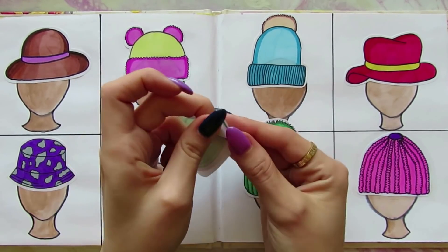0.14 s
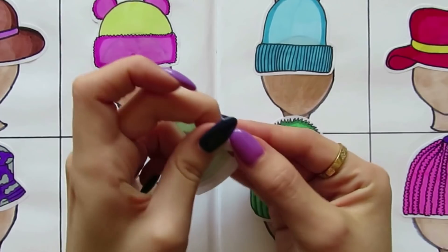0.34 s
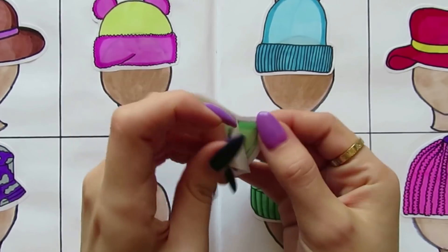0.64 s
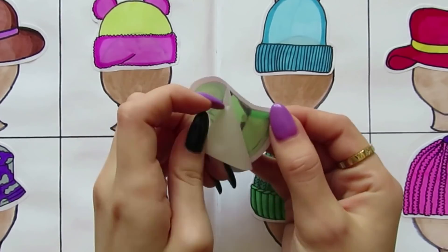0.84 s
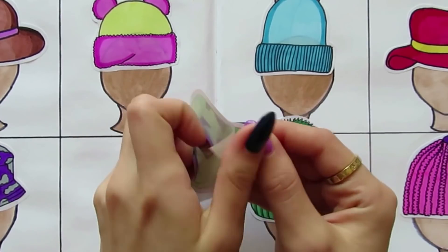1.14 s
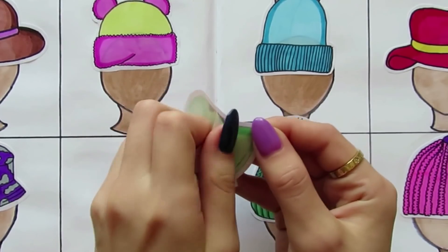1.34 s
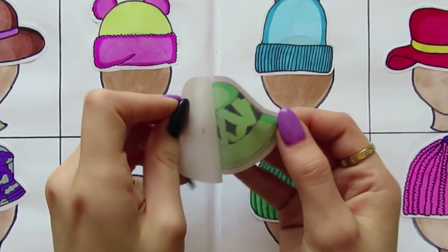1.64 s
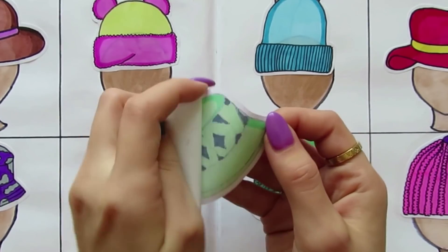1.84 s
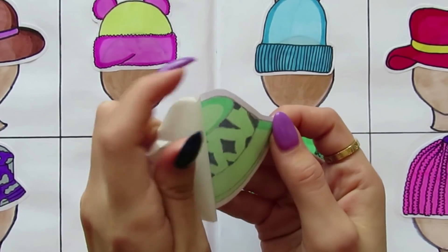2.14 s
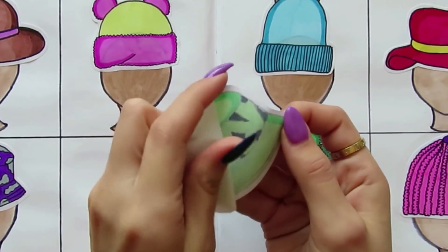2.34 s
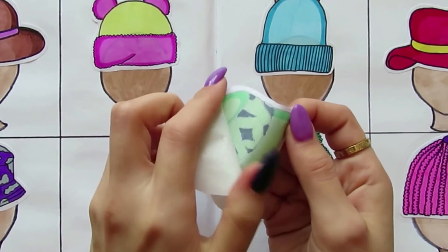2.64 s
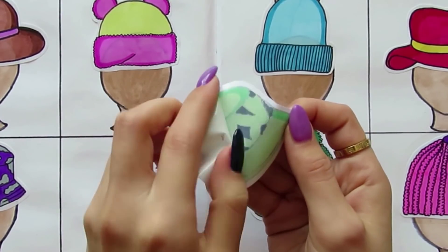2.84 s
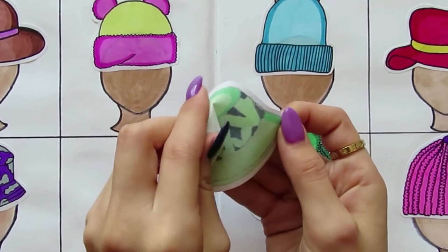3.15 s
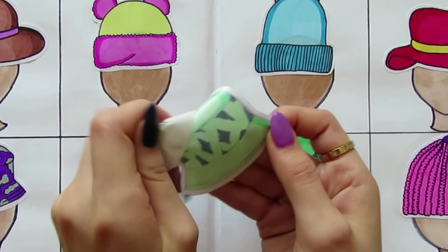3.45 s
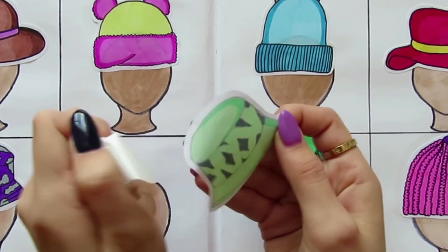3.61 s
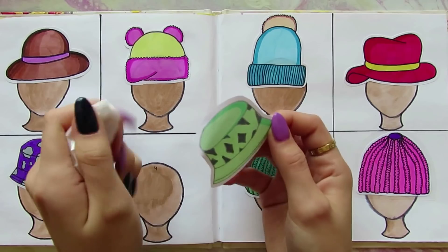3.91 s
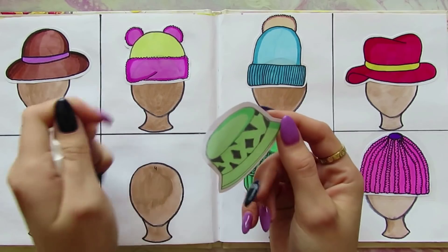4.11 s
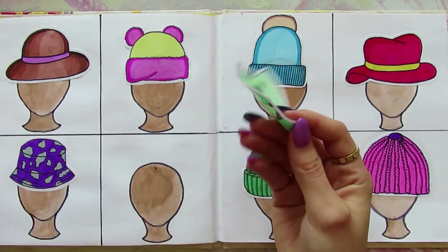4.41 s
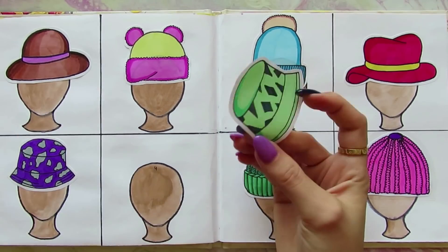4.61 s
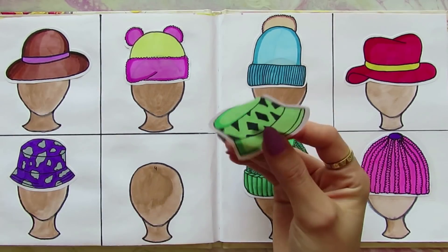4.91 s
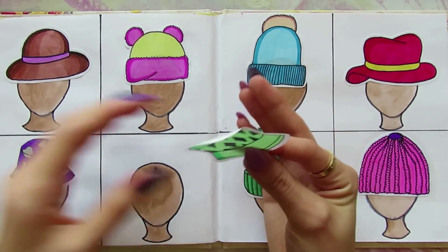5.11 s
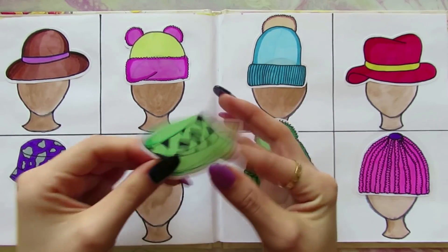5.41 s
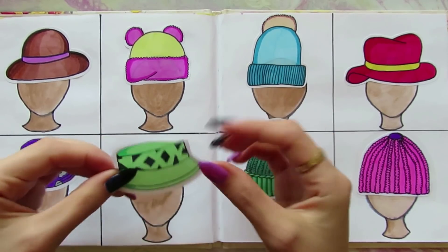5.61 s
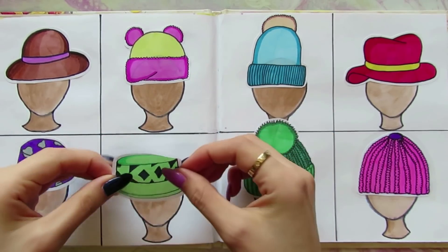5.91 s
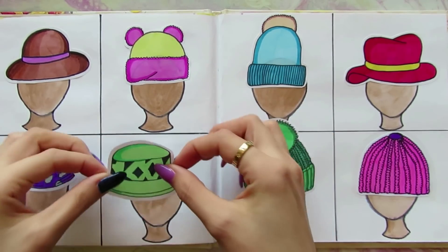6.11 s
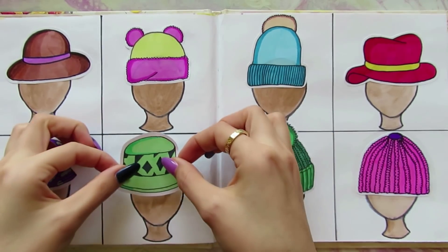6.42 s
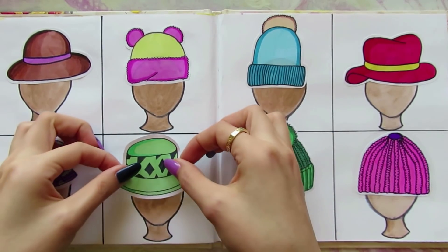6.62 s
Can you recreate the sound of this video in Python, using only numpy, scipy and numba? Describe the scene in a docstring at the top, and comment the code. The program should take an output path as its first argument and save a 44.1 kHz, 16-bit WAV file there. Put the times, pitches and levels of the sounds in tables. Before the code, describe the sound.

Stiff paper rustles, crackles and snaps loudly near the microphone, is crumpled in a hand, then quiets to light clicks over faint low hum.

```python
"""In a small room, close to a microphone, fingers peel a paper sticker off its backing, crumple the backing
and set the sticker on a notebook page. Glue threads and fibres let go in random slips: a dense fine crackle.
Flexing sheets rustle more dully; buckling creases and fingernails snap as short damped bursts, loud enough to clip.
Fingertip taps, single ticks and resonant rasps join in; wavering sines and coloured noise make a low hum."""
import sys
import numpy as np
from scipy import signal
from scipy.fft import rfft, irfft
from scipy.io import wavfile
from scipy.ndimage import uniform_filter1d, map_coordinates
from numba import njit

SR = 44100
rng = np.random.default_rng(int(sys.argv[2]) if len(sys.argv) > 2 else 0)


def output_pcm(signal):
    """Save a mono or channel-first signal as 16-bit PCM at the path in sys.argv[1].

    Samples are clipped to [-1, 1] before scaling.
    """
    pcm = np.clip(np.atleast_2d(signal).T, -1, 1) * 32767
    wavfile.write(sys.argv[1], SR, np.round(pcm).astype(np.int16))


N = 298116
TIME = np.arange(N) / SR  # s
FREQ = np.maximum(np.fft.rfftfreq(N, 1 / SR), 1)  # Hz
TOP_HZ = 15750  # upper band limit


def undb(db):
    """Level definition: decibels to amplitude gain."""
    return np.exp(np.log(10) / 20 * np.asarray(db))


def unit(x):
    """Normalisation: scale to an rms of 1."""
    return x / np.sqrt(np.mean(x ** 2))


def gain_at(points, f):
    """Spectral envelope: gain at f, interpolated in dB over log frequency."""
    hz, db = np.transpose(points)
    return undb(np.interp(np.log(f), np.log(hz), db))


def colour(x, points):
    """Linear filtering: shape x by a spectral envelope, then scale to rms 1."""
    return unit(irfft(rfft(x) * gain_at(points, FREQ), N))


def curves(table):
    """Linear interpolation: each column of a table as a curve in time."""
    s, *columns = np.transpose(table)
    return [np.interp(TIME, s, c) for c in columns]


def walk(rate):
    """Low-pass random process: a smooth wander with rms 1, taking about rate new values per second."""
    hold = max(int(SR / rate), 2)
    steps = np.repeat(rng.standard_normal(N // hold + 1), hold)
    return unit(uniform_filter1d(steps, hold)[:N])


def swell(middle, length):
    """Gaussian envelope: a smooth rise and fall, down to exp(-2) at one length from the middle."""
    return np.exp(-2 * ((TIME - middle) / length) ** 2)


def crackle(rate, spread_db, t60, smooth):
    """Shot noise: random slips, few large and many small, decay as noise; smooth is the share of even hiss."""
    size = undb(spread_db * np.minimum(rng.exponential(size=N), 5))
    slips = (rng.random(N) < rate / SR) * size ** 2
    decay = undb(-60 / (t60 * SR)) ** 2  # of power, per sample
    power = signal.lfilter([1], [1, -decay], slips)
    share = np.clip(smooth, 0, 1)
    return np.sqrt(share + (1 - share) * power / power.mean()) * rng.standard_normal(N)


# pulls on the backing, slides of the fingers, and the room dying away after loud snaps:
# start t/s, end t/s, friction level/dB, swell from start to end/dB, brightness/(dB per octave), flexing level/dB
STROKES = [(0.085, 0.202, -39, 8, 8, -55), (0.352, 0.383, -34.5, -3.5, 7.5, -47),
           (0.442, 0.476, -31, -7.5, 6.5, -47), (0.56, 0.744, -28.5, 3.5, 9, -42),
           (0.758, 0.831, -21.5, 6, 6.5, -36), (0.824, 0.914, -32, -7, 4, -42),
           (0.962, 1.186, -25.5, -7.5, 1, -38), (1.339, 1.415, -29, 3, 2.5, -41),
           (1.462, 1.653, -19.5, 13.5, 6, -36), (1.635, 1.693, -28.5, 7, -4, -32),
           (1.768, 1.787, -10, 7, 9, -29.5), (1.79, 1.94, -30.5, -7, -3.5, -38.5),
           (2.182, 2.203, -17.5, -4, 1, -23.5), (2.401, 2.424, -22.5, 1, -2.5, -31),
           (2.435, 2.568, -23.5, 7, 1, -38), (2.585, 2.734, -31.5, -16.5, -0.5, -39),
           (2.821, 2.838, -25, 1.5, 3.5, -26.5), (2.846, 2.985, -28, -2, 0.5, -34.5),
           (3.022, 3.087, -21.5, 1, 0.5, -33), (3.162, 3.206, -29, -7.5, -4.5, -40),
           (3.249, 3.343, -20, 3, -0.5, -35), (3.422, 3.507, -21, 10, -3, -40.5),
           (3.535, 3.592, -15, 2.5, -3, -39.5), (3.615, 3.686, -20.5, -10, -0.5, -38.5),
           (3.694, 3.746, -17, 9.5, 2.5, -40.5), (3.78, 3.803, -21.5, 18, 0.5, -39.5),
           (3.851, 4.073, -27.5, -11, 1.5, -53), (4.162, 4.24, -34, -4.5, 0.5, -73),
           (4.25, 4.254, -13.5, 3, 3, -60), (4.588, 4.606, -22.5, 5, -0.5, -44),
           (4.616, 4.684, -30.5, 4.5, 1.5, -47.5), (4.85, 4.947, -34, -9, 1, -48),
           (5.024, 5.114, -30, 13.5, 0, -35.5), (5.429, 5.512, -31, 23.5, 0.5, -37),
           (5.623, 5.783, -45.5, -8, -2, -75), (6.035, 6.163, -46, 4, -7, -61),
           (6.359, 6.381, -39, -3.5, 6.5, -44.5)]
# light rustle of the held paper: t/s, friction level/dB, flexing level/dB
HOLDING = [(0, -52, -56.5), (0.2, -45.5, -55), (0.32, -54.5, -61), (0.4, -45, -50), (1.05, -31.5, -40.5),
           (1.28, -39, -48), (1.85, -29, -43.5), (2.35, -34.5, -38.5), (2.8, -41.5, -48), (3.2, -35.5, -37),
           (3.6, -25.5, -33.5), (4.1, -46, -76), (4.43, -46, -53), (4.53, -43, -56), (4.8, -57.5, -50.5),
           (5.75, -50, -51.5), (6.2, -59, -47.5), (6.76, -76, -64)]
HOLDING_TILT_DB = 1.5  # brightness per octave
STROKE_ATTACK_S, STROKE_RELEASE_S = 0.0075, 0.0058  # time constants


def handling():
    """Energy addition: strokes and holding sum in power; gives friction dB, brightness, flexing dB."""
    rub, flex = undb(curves(HOLDING)) ** 2
    bright = HOLDING_TILT_DB * rub
    for start, end, db, swell_db, tilt_db, flex_db in STROKES:
        progress = np.clip((TIME - start) / (end - start), 0, 1)
        before = np.maximum(start - TIME, 0) / STROKE_ATTACK_S
        beyond = np.maximum(TIME - end, 0) / STROKE_RELEASE_S
        effort = undb(swell_db * (progress - .5)) * np.exp(-np.minimum(before + beyond, 20))
        power = (undb(db) * effort) ** 2
        rub = rub + power
        bright = bright + tilt_db * power  # brightness is averaged by power
        flex = flex + (undb(flex_db) * effort) ** 2
    return 10 * np.log10(rub), bright / rub, 10 * np.log10(flex)


# colour of the rubbed paper: f/Hz, level/dB
PAPER = [(1500, -14), (2300, -7.5), (3200, -4.5), (4400, -2), (5400, -3.5), (7300, 0.5), (9000, -6.5),
         (11000, -2), (13000, -7), (15800, -20)]


def friction(level_db, tilt_db, patchy_db=3.0, pivot_hz=6500):
    """Stick-slip friction: glue and fibres let go in grains; resonances shift with the grip and the curl."""
    slips = crackle(rate=1100, spread_db=3.5, t60=0.003, smooth=0.24)
    spectrum = rfft(slips) * gain_at(PAPER, FREQ)
    octave = np.log2(FREQ / pivot_hz)
    out, power = 0, 0
    for centre in np.arange(-2.75, 1.6, .25):  # overlapping bands, in octaves from the pivot
        band = np.maximum(1 - 4 * abs(octave - centre), 0)
        part = irfft(spectrum * band, N)
        gain = undb(tilt_db * centre + patchy_db * walk(18))
        out = out + gain * part
        power = power + gain ** 2 * part.var()
    return unit(out / np.sqrt(power)) * undb(level_db)  # tilting leaves the level unchanged


# colour shared by creases and taps: f/Hz, level/dB
SNAP_COLOUR = [(80, -1), (300, 0.5), (2400, -2), (4400, 0.5), (9000, -1), (11000, 2.5), (16000, -5.5)]


def snaps(events, t60_s, stretch, attack_s, strain_s, strain_db, q, tick_db=9, top_hz=11500, size=4096):
    """Damped resonance: faint creaking peaks as a patch gives way with a broad crack and a brief ring."""
    out = np.zeros(N + size)
    lead = size // 4
    t = (np.arange(size) - lead) / SR
    after = np.maximum(t, 0)
    f = np.maximum(np.fft.rfftfreq(size, 1 / SR), 1)
    strain = undb(strain_db) * np.exp(-abs(t) / strain_s)
    for s, db, hz, crack_db in events:
        t60 = t60_s * undb(stretch * crack_db)
        release = (1 - np.exp(-after / attack_s)) * np.exp(-np.log(1000) * after / t60)
        ring = 1 / (1 + (q * (f / hz - hz / f)) ** 2)
        crack = undb(crack_db) / np.hypot(1, (f / top_hz) ** 2)
        # a small patch radiates little far below its resonance
        radiation = f / np.hypot(f, hz / 4)
        band = gain_at(SNAP_COLOUR, f) * np.hypot(ring, crack) * radiation
        push = rng.standard_normal(size) * (release + strain)
        push[lead + int(attack_s * SR)] += undb(tick_db)  # the first fibre parts all at once
        burst = irfft(band * rfft(push))
        # the energy of a snap is its level held for half a decay constant
        energy = t60 * SR / (2 * np.log(1000))
        start = int(s * SR) - lead
        out[start:start + size] += undb(db) * burst * np.sqrt(energy / np.sum(burst ** 2))
    return out[:N]


# creases buckling and nails flicking off edges: t/s, level/dB, resonance of the paper patch f/Hz,
# broad crack against the resonance level/dB
CREASES = [(0.4393, -2.5, 9700, -13), (0.4425, -3.5, 8900, -20), (0.967, 8.5, 9800, -2.5),
           (1.062, -7, 3610, 2), (1.5973, -2.5, 11200, 1), (1.6453, -3.5, 6580, 10),
           (1.7623, 6, 11300, -14), (1.9406, 2, 4770, -5.5), (2.0738, -7.5, 4440, -13),
           (2.0773, -4, 5050, 5), (2.083, 2.5, 11500, -5), (2.1344, -5, 3930, 3), (2.192, 4.5, 11400, -3.5),
           (2.4245, -6, 9100, 12), (2.428, -5.5, 4570, -7), (2.552, 5, 5250, -10.5),
           (2.6028, -4, 4800, -5.5), (2.821, 7.5, 10500, 1), (2.8409, -2.5, 7700, 3),
           (2.9329, -1, 3140, -28), (3.026, 8, 6300, -6), (3.4087, 3, 3830, -28), (3.4429, 2, 11010, -18),
           (3.4472, 1.5, 11010, 8), (3.5397, 1, 10300, 3), (3.574, 2.5, 10110, -1.5),
           (3.6124, -2.5, 4290, -17), (3.6213, 2, 6340, -7), (3.6283, 8, 8000, -5),
           (3.7216, 7, 12100, -3.5), (3.7554, 3.5, 6000, -6.5), (3.8429, 2, 4850, -10.5),
           (3.8878, -1, 7170, -1), (3.8981, 3, 3040, -22), (3.9164, -8, 1680, -34),
           (3.9462, -4.5, 10500, 34), (4.061, -9, 6150, -21), (4.0791, -1, 7200, -26),
           (4.2061, -8.5, 4130, -42), (4.2215, -3.5, 11500, -9), (4.2856, -11.5, 3570, -37),
           (4.3631, -19, 2930, -18), (4.5962, -6.5, 9400, 2), (4.7658, -15.5, 10200, -6.5),
           (4.831, -17, 7000, -26), (4.8432, -7.5, 5150, -6), (5.124, -8, 3580, -10),
           (5.497, -1.5, 9800, 1), (5.503, 1, 9800, 5), (5.5203, -12, 3280, -11), (5.6143, 5, 6200, -18),
           (5.8097, -15, 4230, -21), (6.0101, 0.5, 7600, -7), (6.0314, -1.5, 6560, 7),
           (6.0355, -6, 4960, 13), (6.2585, -22, 2000, -30)]


def creases():
    """Buckling: a patch snaps to a new shape; a broader crack runs along the crease and lasts longer."""
    # t60_s holds at a crack of 0 dB; stretch is dB of length per dB of crack
    return snaps(CREASES, t60_s=0.012, stretch=0.1, attack_s=0.00054, strain_s=0.004, strain_db=-30.5, q=1.26)


# fingertips knocking on the sheet and the page: t/s, level/dB, resonance of the sheet f/Hz,
# broad crack against the resonance level/dB
TAPS = [(0.4425, -18, 1410, -26), (0.7231, -16, 600, -13), (0.8975, -16.5, 690, -28),
        (1.1421, -4.5, 300, 3), (1.7837, -1.5, 440, -2), (2.1461, -3.5, 1070, -7), (2.9329, -6, 475, -13.5),
        (3.275, -12.5, 684, -24), (3.3088, -11, 358, -16.5), (4.9347, -16, 310, -10),
        (4.9422, -18.5, 700, -13), (5.0258, -14, 1700, -35), (5.1117, -4, 300, 3), (5.117, -4.5, 600, 8),
        (5.3252, -19.5, 450, -6), (5.3371, -21, 353, -11.5), (5.783, -22, 1440, -14.5),
        (5.8097, -16, 325, -3), (6.2363, -29, 1100, -28.5), (6.3535, -20.5, 480, -16.5)]


def taps():
    """Impact excitation: a knock sets off a lower, broadly damped resonance of the sheet."""
    return snaps(TAPS, t60_s=0.022, stretch=0, attack_s=0.00042, strain_s=0.001, strain_db=-24.5, q=0.59)


def ticks(events, ring_hz=9800, shiver_db=-13, shiver_s=0.0015, size=512):
    """Impulse response: a release flicks a small patch, each at its own pitch; the sheet shivers briefly."""
    out = np.zeros(N + size)
    t = np.arange(size) / SR
    for (s, db), chance in zip(events, rng.standard_normal((len(events), size + 1))):
        hz = min(ring_hz * 2 ** (.5 * chance[0]), TOP_HZ)
        flick = np.sin(2 * np.pi * hz * t) * np.exp(-hz * t)
        shiver = undb(shiver_db) * chance[1:] * np.exp(-t / shiver_s)
        tick = signal.lfilter([1, -1], [1, -.5], flick + shiver)  # a small patch radiates little bass
        start = int(s * SR)
        out[start:start + size] += undb(db) * tick / abs(tick).max()
    return out[:N]


# glue threads and nail edges letting go: t/s, peak level/dB
RELEASES = [(0.6803, -3), (0.7708, -3.5), (0.8825, -10), (1.035, -1), (1.1693, -3), (1.6545, 3),
            (2.0062, -6), (2.0593, -9), (2.1257, -4), (2.4082, -4), (3.5916, 0), (3.9744, -2),
            (4.0035, -0.5), (4.0284, -10), (4.352, -7), (4.4656, -6), (5.2562, -16), (5.2952, -23),
            (5.3958, -16.5), (6.5823, -22)]


def releases():
    """Sudden release of tension: glue threads and nail edges let go with one sharp tick each."""
    return ticks(RELEASES)


def crinkles(level_db, most_db=-25, over_db=3, count=450):
    """Random impulses: tiny creases tick, louder with friction up to most_db; few are loud, many soft."""
    place, luck = rng.random((count, 2)).T
    at = (place * N).astype(int)
    db = np.minimum(level_db[at], most_db) + over_db - 4.5 * np.log(luck + .04)
    return ticks(np.transpose([at / SR, db]), ring_hz=7000)


# colour of the flexing sheets: f/Hz, level/dB
SHEET = [(100, -3), (220, 2.5), (400, -2), (500, 2), (650, -4), (820, 4), (1000, 0), (1900, -0.5),
         (4000, -15)]


def flexing(level_db):
    """Bending: the sheets yield in sparser, longer jerks, a coarser and duller rustle."""
    jerks = crackle(rate=420, spread_db=3.0, t60=0.017, smooth=0.34)
    return colour(jerks, SHEET) * undb(level_db)


# resonant rasps of the curled sheet, and one low ring after a tap:
# middle t/s, length/s, resonance f/Hz, width of each filter stage f/Hz, level/dB
RASPS = [(2.5, 0.11, 11900, 1200, -30.5), (3.268, 0.045, 2190, 900, -23.5), (3.28, 0.037, 5220, 1000, -23),
         (3.314, 0.024, 823, 50, -28)]


def rasps():
    """Resonance under random excitation: uneven jerks drive the sheet's rasps and one low ring after a tap."""
    spectrum = rfft(crackle(rate=400, spread_db=3, t60=.003, smooth=0))
    out = 0
    for s, length, hz, width, db in RASPS:
        resonance = 1 / (1 + 2j * (FREQ - hz) / width) ** 2
        out = out + undb(db) * swell(s, length) * unit(irfft(spectrum * resonance, N))
    return out


@njit
def resonator(x, hz, width):
    """State-variable filter: a band-pass with a moving centre and a gain of 1 there."""
    y, band, low = np.empty(len(x)), 0., 0.
    for i in range(len(x)):
        g, damping = np.tan(np.pi * hz[i] / SR), width / hz[i]
        v = (band + g * (x[i] - low)) / (1 + g * (g + damping))
        band, low, y[i] = 2 * v - band, low + 2 * g * v, damping * v
    return y


# hollow of the fist that crumples the backing: t/s, resonance f/Hz, strength (0-1)
FIST = [(3.58, 3400, 0.1), (3.66, 3400, 0), (3.84, 3050, 0.2), (3.92, 2870, 0.4), (4.07, 2830, 0.4),
        (4.27, 3030, 0.6), (4.42, 2600, 0.4), (4.52, 2700, 0.3)]


def fist(x, width_hz=1550, gain_db=5.5):
    """Cavity resonance: the hand closes round the backing and its hollow rings with the rustle."""
    hz, strength = curves(FIST)
    once = resonator(x, hz, float(width_hz))
    ring = resonator(once, hz, float(width_hz))
    closed = (TIME > FIST[0][0]) & (TIME < FIST[-1][0])
    return x + undb(gain_db) * strength * closed * ring


# room echo colour: f/Hz, level/dB
ECHO = [(100, 7.5), (2500, 8), (7000, 4), (16000, -7)]


def room(x, t60=0.54, wet_db=-21, desk_db=-21, desk_s=0.013):
    """Reflection and reverberation: a near surface echoes once; walls add a scattered, pitchless tail."""
    decay = np.exp(-np.log(1000) * TIME / t60)
    tail = colour(rng.standard_normal(N), ECHO) * decay * (TIME > desk_s)
    wet = signal.fftconvolve(x, tail[:SR] / np.sqrt(np.sum(tail ** 2)))[:N]
    scattered = map_coordinates(wet, [(TIME + .00013 * walk(300)) * SR])  # jittered reading times
    desk = np.pad(x, (int(desk_s * SR), 0))[:N]
    return x + undb(desk_db) * desk + undb(wet_db) * scattered


# steady hum tones, before wavering and swelling: f/Hz, level/dB
HUM = [(99.9, -47), (181, -56), (222.5, -55.5)]
# further low tones that come and go: middle t/s, length/s, f at the middle/Hz, glide/(Hz per s)
HUM_SWELLS = [(1.98, 0.21, 180.3, -0.5), (2.37, 0.36, 223, 45), (2.418, 0.42, 152, 35.5),
              (3.02, 0.19, 180.5, 1)]
# colour of the room rumble: f/Hz, level/dB
RUMBLE = [(15, -17.5), (30, -1), (140, -3), (260, -4), (400, -9), (2000, -28.5)]
# swelling and dipping of steady tones and rumble: t/s, level/dB
LOW_SWELL = [(0, -2.5), (.33, -0.5), (.36, 4), (3.85, 4.5), (3.97, -12), (4.4, -7), (4.9, -3), (6.1, -2.5),
             (6.76, 1)]


def hum(waver_db=2.0, drift=0.7, rumble_db=-45.5, passing_db=-44.5):
    """Superposition: wavering sines over a soft rumble; a few more tones swell, glide and fade."""
    tones, passing = 0, 0
    for hz, db in HUM:
        level = undb(db + waver_db * walk(5.1))
        tones = tones + level * np.sin(2 * np.pi * hz * TIME + drift * walk(6.8))  # drift in radians
    for s, length, hz, glide in HUM_SWELLS:
        phase = 2 * np.pi * np.cumsum(hz + glide * (TIME - s)) / SR
        passing = passing + swell(s, length) * np.sin(phase)
    rumble = undb(rumble_db) * colour(rng.standard_normal(N), RUMBLE)
    steady = (np.sqrt(2) * tones + rumble) * undb(curves(LOW_SWELL)[0])  # sqrt(2): rms to sine peak
    return steady + np.sqrt(2) * undb(passing_db) * passing


def scene(hiss_db=-68):
    """Superposition: all handling reaches both channels alike; each channel adds its own faint hiss."""
    level_db, tilt_db, flex_db = handling()
    snapping = creases() + taps()
    rustle = friction(level_db, tilt_db) + flexing(flex_db) + rasps()
    ticking = crinkles(level_db) + releases()
    paper = rustle + ticking + snapping
    return room(fist(paper)) + hum() + undb(hiss_db) * rng.standard_normal((2, N))


def gain_control(x, threshold=0.76, attack_s=0.018, release_s=0.024, depth=120):
    """Dynamic compression: peaks over the threshold charge a detector that lowers the gain until it leaks."""
    excess = np.maximum(abs(x).mean(axis=0) - threshold, 0)
    leak = np.exp(-1 / (release_s * SR))
    charge = signal.lfilter([1 - leak], [1, -leak], excess)
    attack = np.exp(-1 / (attack_s * SR))
    return x / (1 + depth * signal.lfilter([1 - attack], [1, -attack], charge))


# the sound drops out for an instant: start t/s, end t/s
DROPOUT = (0.334, 0.345)


def record(dry):
    """Overload and band-limiting: peaks clip and duck what follows; one dropout falls silent; the top is cut."""
    ducked = gain_control(np.clip(dry, -1.08, 1.08))
    live = (TIME < DROPOUT[0]) | (TIME > DROPOUT[1])
    low_pass = signal.ellip(8, .2, 70, TOP_HZ, fs=SR, output="sos")
    return signal.sosfilt(low_pass, ducked * live)


dry = scene()
out = record(dry)
output_pcm(out)
```